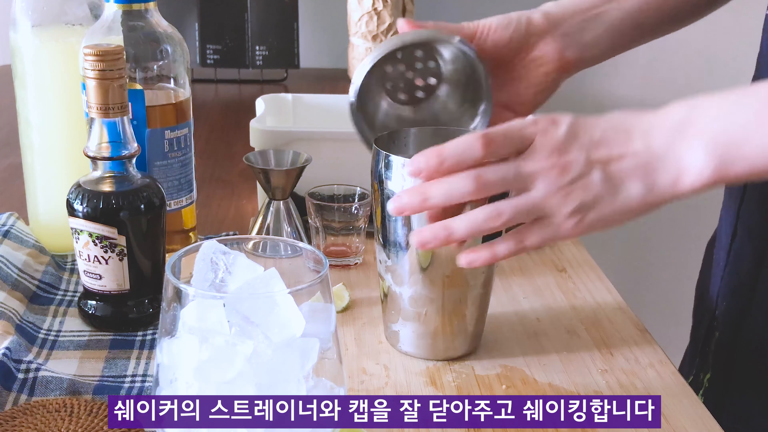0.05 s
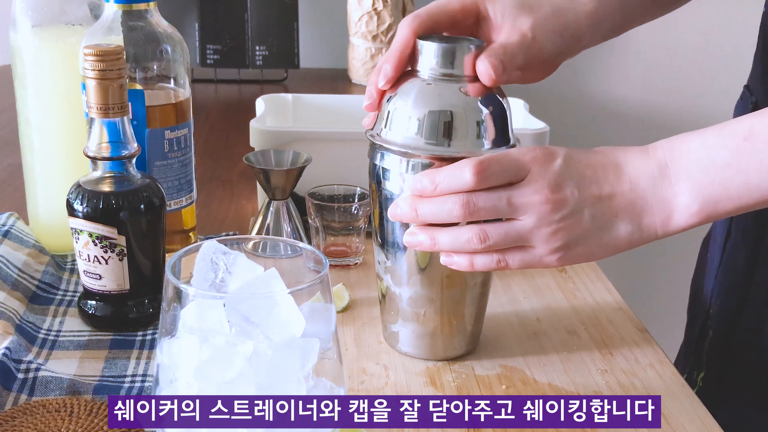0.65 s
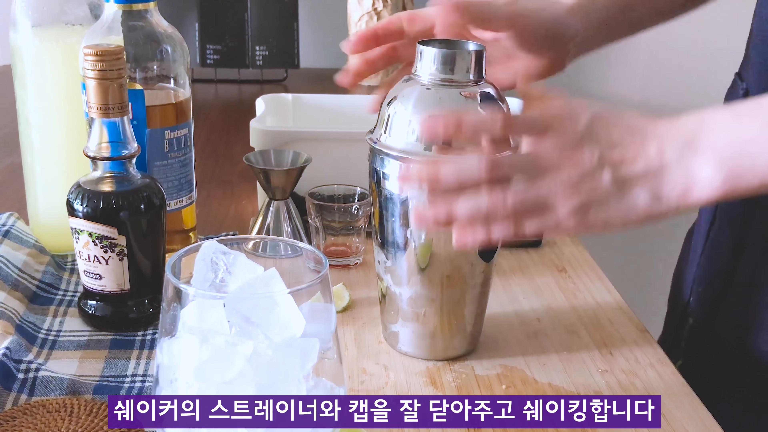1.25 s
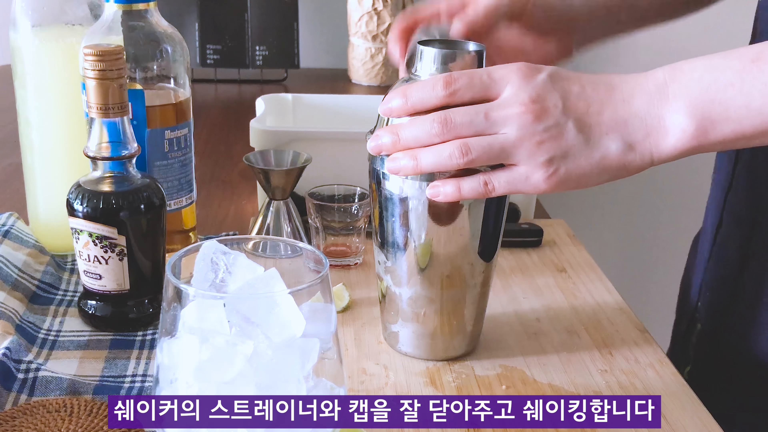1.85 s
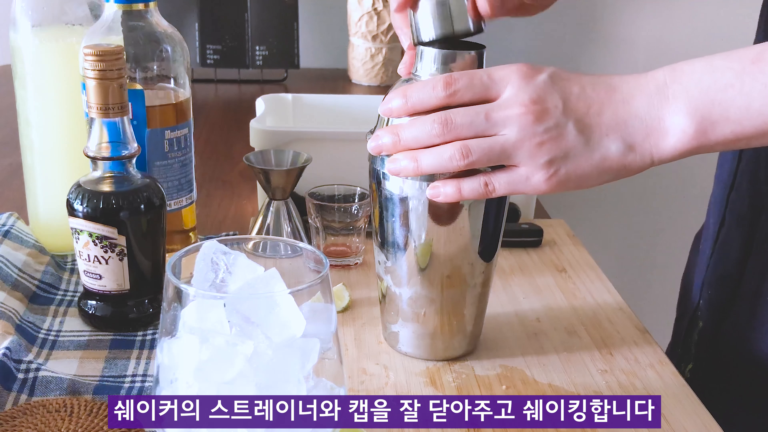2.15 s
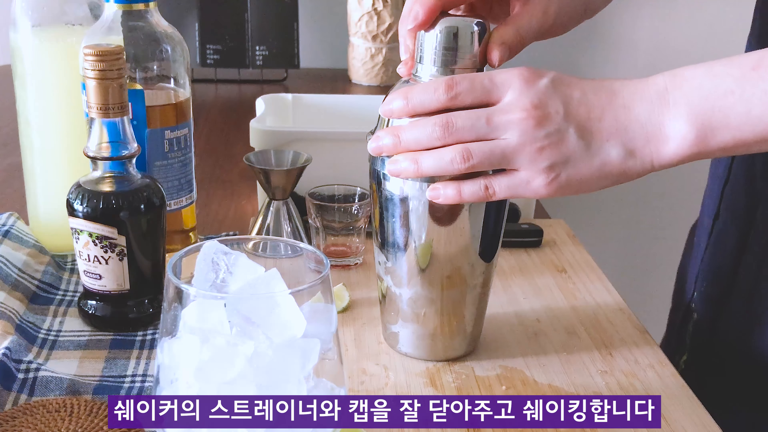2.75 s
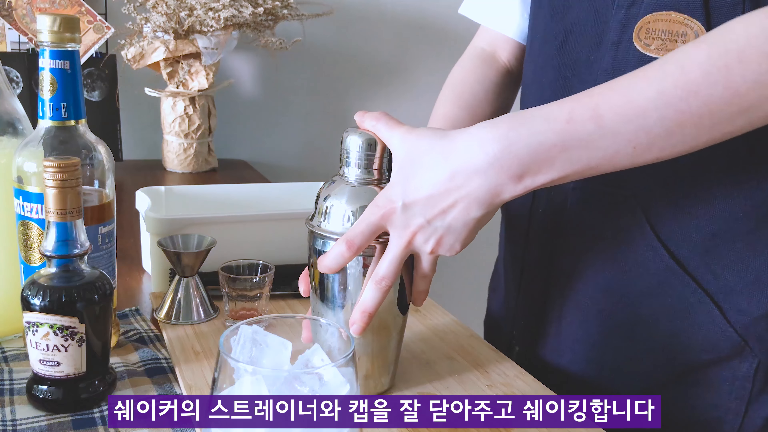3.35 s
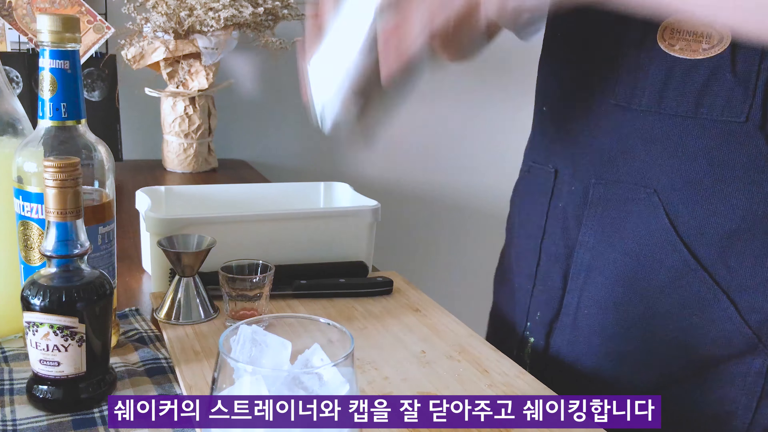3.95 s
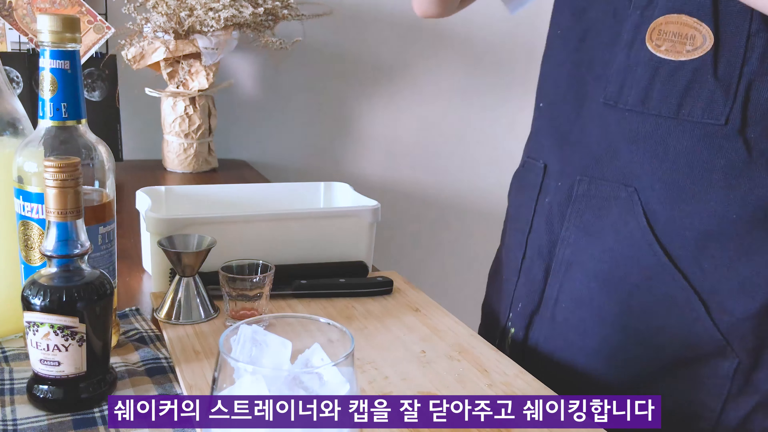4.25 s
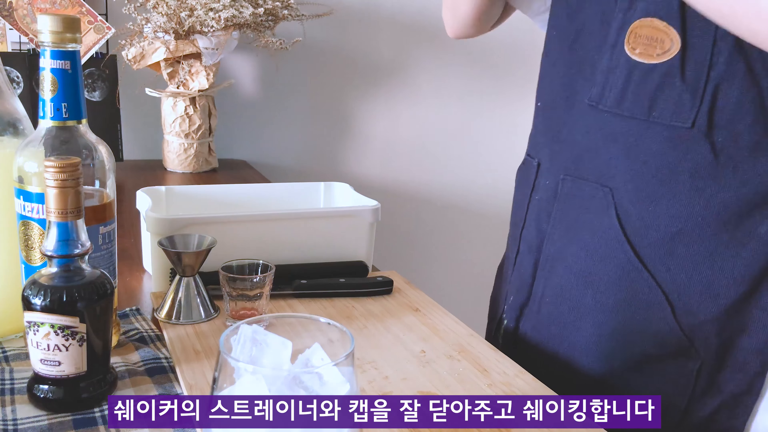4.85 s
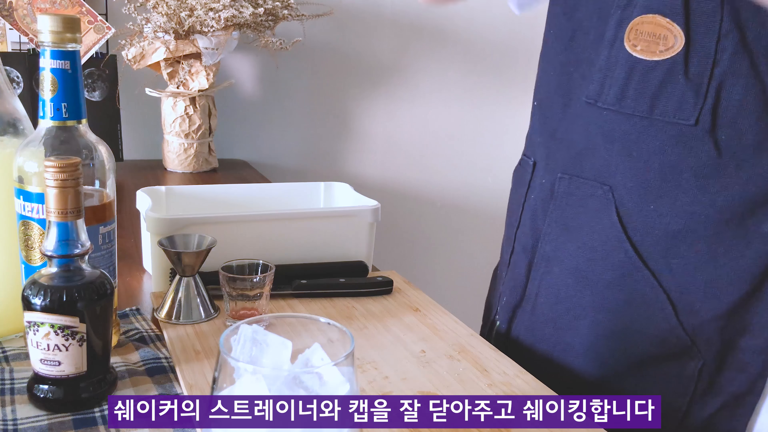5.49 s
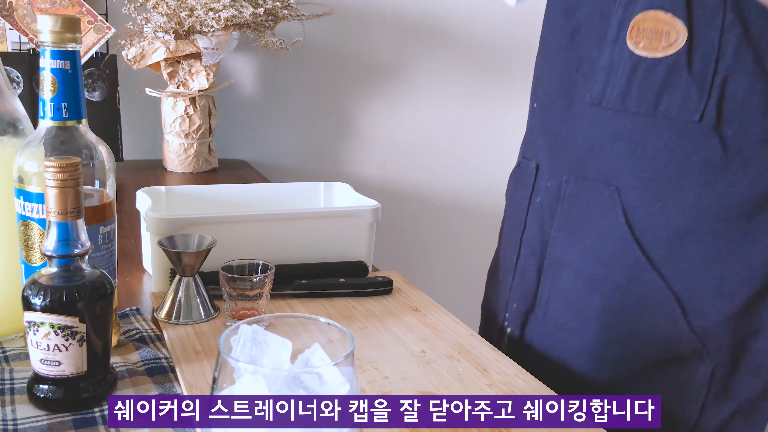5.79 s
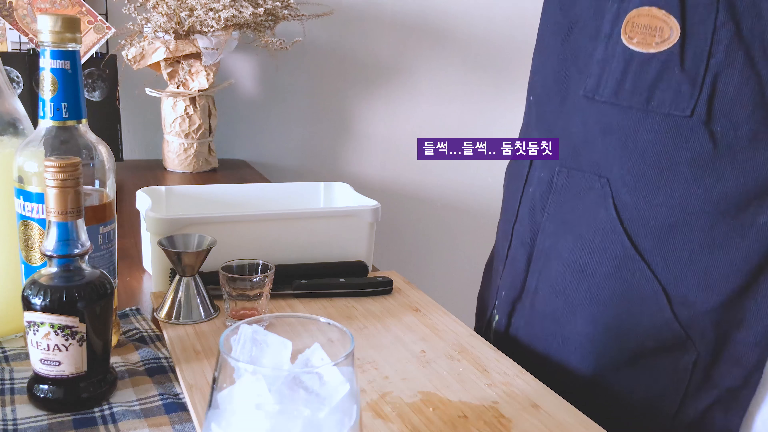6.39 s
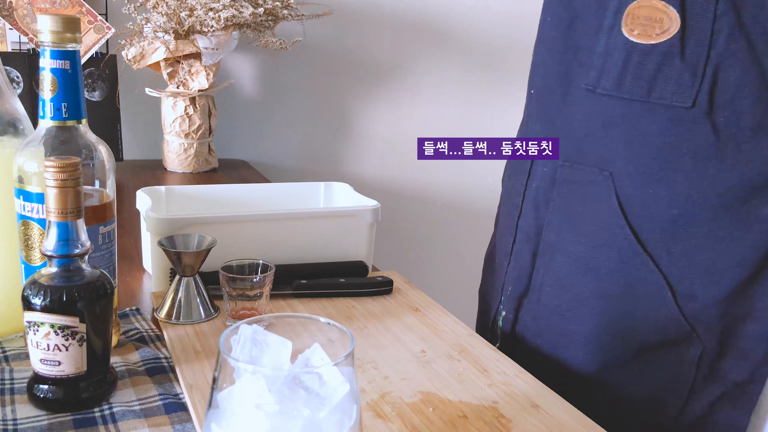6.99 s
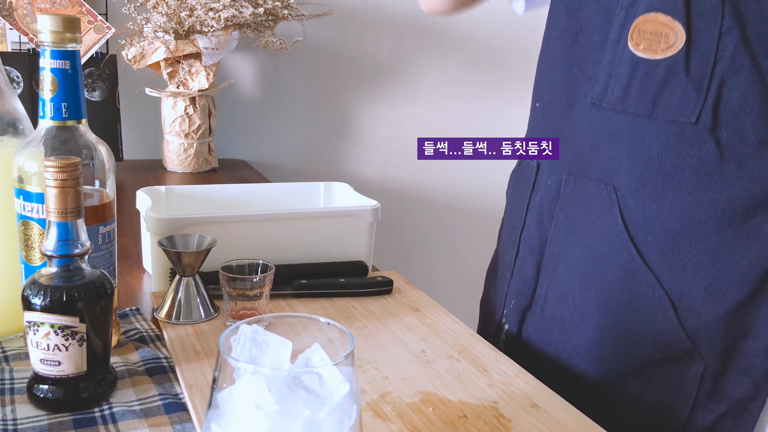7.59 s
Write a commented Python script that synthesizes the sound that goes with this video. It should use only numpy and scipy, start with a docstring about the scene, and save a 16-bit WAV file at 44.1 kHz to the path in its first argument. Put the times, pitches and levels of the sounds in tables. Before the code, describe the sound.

A metal lid and cap clank onto a cocktail shaker, then ice rattles fast and hard inside as it is shaken.

```python
"""A small room, the microphone close to a steel cocktail shaker on a wooden board. The strainer lid
clanks on and slides home, the tin knocks on the wood, the small cap clicks and scrapes into place.
The room's hum and hiss drop abruptly. The shaker is lifted and shaken hard: at each turn of the stroke
ice cubes slam into an end of the tin and set it ringing, while drink and chips churn between them."""
import sys
import numpy as np
from scipy import signal
from scipy.fft import rfft, irfft, next_fast_len
from scipy.io import wavfile
from scipy.ndimage import uniform_filter1d

SR = 44100
rng = np.random.default_rng(int(sys.argv[2]) if len(sys.argv) > 2 else 0)


def to_wav(s):
    """Save 16-bit WAV."""
    ch = np.atleast_2d(s).T  # columns
    pcm = np.round(np.clip(ch, -1, 1) * 32767)  # PCM
    wavfile.write(sys.argv[1], SR, pcm.astype(np.int16))


N = 336483
TIME = np.arange(N) / SR

# Spectra of the background and of the contacts. Each row: frequency in Hz, relative level in dB.
AIR_EARLY_COLOUR = [(12, -28), (20, -13), (48, 0.5), (75, -3), (148, -0.5), (261, -3), (336, -3),
                    (983, -11), (1200, -10), (1300, -12.5), (1730, -15.5), (2790, -23.5), (9670, -32.5),
                    (15600, -38.5), (17000, -46)]
AIR_LATE_COLOUR = [(12, -56), (20, -24.5), (31, -21), (43, -10), (100, -6), (176, -12), (214, -10.5),
                   (276, -13.5), (543, -14.5), (830, -19), (1780, -25.5), (3130, -34.5), (9140, -43),
                   (14400, -48), (17000, -61)]
RUMBLE_COLOUR = [(20, -15), (50, -2.5), (80, -3.5), (150, -3), (300, -1), (600, -11.5), (2000, -58.5)]
STEEL_COLOUR = [(88, -31.5), (150, -21), (760, -12.5), (1680, -3), (1970, -13), (2400, -6.5), (3560, -8),
                (4090, -8.5), (5950, -9), (7550, -12.5), (8340, -11.5), (13400, -16), (17000, -23.5)]
BOARD_COLOUR = [(100, -6.5), (500, 1), (1000, -1.5), (1900, 2), (4000, -10), (8000, -15), (16000, -40)]
ICE_COLOUR = [(53, -56), (90, -19), (252, -10), (321, -1.5), (436, -6), (606, -4.5), (723, -0.5),
              (2120, -2), (2360, -3), (3010, -7.5), (5560, -11.5), (8240, -14.5), (9000, -14.5),
              (15900, -23.5), (17000, -22)]
CHIP_COLOUR = [(100, -36), (300, -27), (800, 0.5), (2000, 4), (4000, -3), (7000, -6.5), (10000, -13),
               (16000, -18)]
# Handling rumble and steel sliding on steel. Each row: time in seconds, relative level in dB.
RUMBLE_LEVEL = [(0, -52), (.9, -52), (.95, -39.5), (1.02, -56), (2.95, -71), (2.99, -40.5), (3.045, -42),
                (3.06, -71), (4.1, -66.5), (4.3, -53), (5.5, -58), (6.5, -54), (7.63, -60)]
LID_SLIDE = [(.35, -70), (.37, -45), (.43, -42), (.5, -42), (.53, -38.5), (.57, -38.5), (.61, -50),
             (.68, -81), (.76, -48), (.8, -75)]
CAP_SLIDE = [(1.95, -73), (1.97, -40), (2.03, -34), (2.08, -41.5), (2.13, -66), (2.2, -46), (2.27, -58),
             (2.4, -71)]
LIFT_SLIDE = [(3.4, -82), (3.5, -64), (3.62, -66), (3.7, -73.5), (3.78, -74.5), (3.95, -87), (4.12, -73),
              (4.17, -51)]
# Single blows. Each row: start in seconds, clack level in relative dB, then thud, tick and ring in dB
# over the clack; for cap and cubes also a nominal pitch in Hz.
LID_BLOWS = [(.159, -39.5, -13.5, -1, -20), (.2548, -49, 10, -16, -18), (.3443, -18, -21, 0.5, -3.5),
             (.3495, -23, -1, -3, 0), (.4094, -29, -5, -0.5, -18), (.52, -35.5, 0.5, -6, -3),
             (.735, -64, 14, -6, 1), (.7771, -39, 0, -9.5, -22), (1.197, -56.5, 10, 5, -14),
             (1.2316, -50, 6, 7, -5)]
BOARD_BLOWS = [(1.6836, -36.5, -10, -10, -10), (1.687, -42, 16.5, -14, 16.5), (1.693, -44, 14, -1, 10),
               (1.714, -38.5, 3, -9, -10), (3.8549, -52, 2, -6, -2), (3.9312, -47.5, 0, -14, -10)]
CAP_BLOWS = [(1.9537, -26.5, -12, 7.5, -8, 2080), (1.961, -31, -12, 0, 1, 3900),
             (2.0149, -38.5, -1, 3, -6, 1690), (2.045, -39, -9, -7, 0, 3820),
             (2.0994, -30.5, -17, 12.5, 10, 2475), (2.109, -35, -2, 10, 11, 2370),
             (2.145, -42.5, -19, 0, 12.5, 2560), (2.2, -52, -15, -10, 16, 2310),
             (2.232, -55, -24, -7, 17, 2510), (2.3147, -50, -15, 5, 2, 2860), (2.4641, -55, 0, 2, 4, 3800)]
CUBE_BLOWS = [(4.1665, -52, 9, -7, -1, 657), (4.1793, -30, -32.5, 4.5, 6, 1790),
              (4.204, -33, -14, -11, 6, 2790), (4.234, -31.5, -15, 9, 9, 2030),
              (4.243, -23, -3, 4, 4.5, 2350), (4.25, -24.5, -6, 2, -3, 2310),
              (4.338, -23.5, -2.5, 1, 7.5, 4080), (4.357, -26.5, 1, 4, 6, 1160),
              (4.4739, -23, -6, -19, -9, 884), (4.4891, -23.5, -21, -2.5, 5, 1540),
              (4.512, -19.5, -4, -4, 4, 990), (4.5197, -26.5, -6, -12, 12.5, 2700),
              (4.564, -27.5, -12, 2.5, 0, 4000), (4.624, -27, 4, -1, 4, 1820),
              (4.636, -24.5, -10, 5.5, 11.5, 2240), (4.6413, -22, -5.5, 5, 6, 2470),
              (4.6707, -20, -24, -14, -5, 1760), (4.7493, -28, -19, 5, 8, 1410),
              (4.7654, -23, -7, -11, 4, 980), (4.775, -19, -13, 4.5, 8, 1280),
              (4.8397, -17.5, -13, -13, 3, 1940), (4.894, -27.5, -11, -7, 0, 1460),
              (4.9476, -19.5, -5, -5, 0, 2780), (4.9643, -24.5, -7, -10, 6, 1120),
              (5.0643, -20, -22, 7, 9.5, 2402), (5.08, -30, -11, 9, -6, 2550),
              (5.2037, -20, -16, -3, -2, 1800), (5.229, -22, -18, -7, 2, 1800),
              (5.2762, -31, 1, 2, -6, 2920), (5.2963, -27.5, 8, 11.5, 19, 5120),
              (5.3318, -36, 7, -12, 14, 1130), (5.4142, -24.5, -5, -19, 7, 1485),
              (5.4367, -22.5, -10, -21, 0, 2300), (5.4957, -23, 6, -0.5, 5.5, 1375),
              (5.505, -26.5, -4, 4.5, 8, 1450), (5.631, -36, -20, -10, 2, 1640),
              (5.6553, -22, 2.5, -2, -7, 760), (5.6858, -27.5, -19, 5.5, 9, 3050),
              (5.7677, -20, -8, -6.5, 2.5, 730), (5.8781, -25, -12, -8, 6, 2000),
              (5.8852, -16, -7.5, -14.5, -2.5, 1440), (5.8892, -15.5, -6.5, -5, -5, 1480),
              (5.9401, -28.5, -10, -11, -5, 2080), (5.983, -28.5, 4.5, 6.5, 8, 1370),
              (6.0118, -23.5, -8, 1, 4.5, 2286), (6.1269, -27.5, -13, -1.5, 6, 1720),
              (6.153, -19, -15, 4, 3.5, 3050), (6.2336, -24.5, -9, 5, 9, 1860),
              (6.3157, -27.5, -9, -14, 3, 1480), (6.35, -18, -3, -4, -1.5, 2380),
              (6.4252, -28, 5.5, 5, 11, 4140), (6.4597, -25, -15, -1, 5, 2090),
              (6.4637, -24, -3, 6.5, -7, 1990), (6.5594, -43, -9, 8, -4, 4920),
              (6.573, -24, -14, 0.5, -1, 1420), (6.5865, -23, -22, 0, 7, 1690),
              (6.6094, -26, -15, 3, -2, 5270), (6.6456, -29, -17, 5, 5.5, 1140),
              (6.6735, -22.5, -6, -.5, -1, 1150), (6.767, -22, -23, -9, -15, 1480),
              (6.788, -18, -22, -13, -22, 1370), (6.8119, -19.5, -8.5, -19, -6, 1880),
              (6.8345, -25.5, -20, 1.5, 8, 4000), (6.9036, -28, 3.5, -4, 8.5, 2560),
              (7.0012, -33.5, -12, 6, 12, 1030), (7.0243, -26.5, -22, -2.5, 0, 2020),
              (7.045, -25, -3, -10, -4, 3680), (7.085, -33, 2, -15, 6, 2340),
              (7.1278, -25, -1.5, -3, 3.5, 816), (7.147, -22, -10, -14, -1, 1830),
              (7.2233, -31, -20, -2, 10, 5700), (7.2417, -23.5, -4, -3.5, -5, 950),
              (7.3035, -26.5, 1, 0, 8, 2840), (7.37, -19, -30, 1, 4.5, 2330),
              (7.4395, -28.5, -1, -3, 7, 1070), (7.4675, -24, -22, -12, -8, 2120),
              (7.4863, -35, -10, 11.5, -3, 4000), (7.5247, -26.5, -12, -17, -4, 1690),
              (7.5576, -22.5, 2, 2.5, 0.5, 714)]
# The bands of thud, clack and tick. Each row: lower and upper edge in Hz.
BLOW_BANDS = [(100, 800), (800, 3200), (3200, 18000)]
# Ringing modes. Each row: frequency in Hz, relative level in dB, seconds to fade by 60 dB.
LID_MODES = [(329.7, -13.5, 0.26), (555, -13, 0.04), (850, -12.5, .12), (1373, -15, .25), (1498, -14, 0.43),
             (1745, -17, 0.61), (1740, -23, .3), (2464, -15.5, 0.35), (3025, -21.5, 0.25),
             (4030, -14.5, .25), (4150, -17, .33), (4390, -21.5, .42), (5220, -18.5, 0.45),
             (5680, -28, .45), (6140, -24.5, 0.19), (6180, -27, .3), (6650, -1, 0.13), (6640, -27, 0.37),
             (8920, -6.5, 0.14), (9420, -16, 0.13), (9700, -23.5, 0.31), (12200, -28.5, .45),
             (12230, -31.5, .5), (13440, -27.5, .55), (15510, -26.5, .4)]
BOARD_MODES = [(339, -14, .12), (475, 4.5, 0.1), (702, -8, 0.18), (1710, -14.5, .05)]
CAP_MODES = [(1670, -30.5, 0.22), (2097, -13, 0.073), (2370, -10.5, 0.15), (2530, -24.5, 0.15),
             (2850, -34, 0.38), (3750, -32, 0.374), (3970, -26, 0.17), (5000, -17, 0.22), (5600, -21, .15),
             (7000, -10.5, 0.24), (7580, -1, 0.29), (7400, -12, .3), (8800, -25.5, 0.18),
             (10500, -17.5, 0.19), (13700, -22.5, .4), (15450, -25.5, .4)]
FULL_TIN_MODES = [(158.6, -25, 0.15), (330, -16.5, 0.11), (343, -21.5, 0.074), (471, -16.5, 0.12),
                  (546.4, -17, 0.29), (707, -18, 0.2), (770, -41, 0.071), (1135, -14.5, 0.21),
                  (1555, -46, 0.073), (2450, -29, 0.16), (4460, -15, 0.064), (5520, -40, 0.12),
                  (6880, -13, 0.038), (8900, -8, 0.048), (11500, -26, 0.07)]
# Turns of the stroke, about nine a second, when the load lands in an end of the tin.
# Each row: start in seconds, length of the landing in seconds, relative level in dB.
TURNS = [(4.179, .035, -41), (4.24, .045, -32.5), (4.34, 0.043, -31.5), (4.48, .065, -26.5),
         (4.626, .075, -32.5), (4.715, 0.073, -28.5), (4.845, .07, -31), (4.945, 0.055, -30.5),
         (5.045, 0.056, -28.5), (5.205, 0.072, -28), (5.296, 0.036, -30), (5.393, 0.039, -25.5),
         (5.485, 0.058, -27.5), (5.654, 0.043, -29), (5.76, .03, -34), (5.875, 0.046, -29.5),
         (5.98, 0.059, -30), (6.107, 0.041, -24.5), (6.22, 0.036, -26.5), (6.313, 0.052, -26.5),
         (6.43, 0.051, -27), (6.572, .04, -35.5), (6.645, 0.058, -31.5), (6.77, 0.061, -28),
         (6.873, 0.055, -30), (7, 0.064, -31.5), (7.114, 0.038, -33.5), (7.221, 0.045, -30.5),
         (7.3, .035, -33.5), (7.429, 0.064, -29.5), (7.49, 0.049, -33.5), (7.556, 0.026, -33.5)]
# The room's reverberation. Each row: frequency in Hz, seconds to fade by 60 dB.
ROOM_DECAY = [(150, 0.35), (500, 0.57), (1500, 0.4), (4000, 0.46), (8000, 0.4), (16000, 0.3)]


def amp(db):
    """Decibels to gain."""
    return 10 ** (np.asarray(db) / 20)


def unit(x):
    """Scales to rms 1."""
    return x / np.sqrt(np.mean(x ** 2) + 1e-20)


def at_hz(points, hz):
    """Reads a table on a log-frequency axis."""
    f, value = np.transpose(points)
    return np.interp(np.log(hz + 1), np.log(f + 1), value)


def level(curve):
    """Gain over time from rows of seconds and dB, silent outside them."""
    s, db = np.transpose(curve)
    return amp(np.interp(TIME, s, db, left=-150, right=-150))


def add(mix, start, sound):
    """Mixes a sound in at a start in seconds."""
    part = mix[max(round(start * SR), 0):][:len(sound)]
    part += sound[:len(part)]


def tinted(x, colour):
    """Gives a signal a spectrum."""
    count = x.shape[-1]
    size = next_fast_len(count)
    gains = amp(at_hz(colour, np.fft.rfftfreq(size, 1 / SR)))
    return irfft(rfft(x, size) * gains, size)[..., :count]


def noise(colour):
    """Steady coloured noise of rms 1."""
    return unit(tinted(rng.standard_normal(N), colour))


def grains(per_s, spread_db):
    """Sparse clicks of uneven size."""
    sizes = amp(spread_db * np.minimum(rng.exponential(1, N), 3.5))
    return sizes * rng.choice([-1., 1.], N) * (rng.random(N) < per_s / SR)


def room_tone(drop_s=3.055):
    """Hum and hiss, abruptly quieter part way through, with the low rumble of handling."""
    early = amp(-45.5) * noise(AIR_EARLY_COLOUR)
    late = amp(-56.5) * noise(AIR_LATE_COLOUR)
    rumble = level(RUMBLE_LEVEL) * noise(RUMBLE_COLOUR)
    return np.where(TIME < drop_s, early, late) + rumble


def shell_colour(modes, width_hz, valley_db):
    """A rough contact drives the steel shell in broad humps around its modes."""
    grid = np.geomspace(60, 20000, 600)
    hz, db, _ = np.transpose(modes)[:, :, None]
    humps = np.sum(amp(db - db.max()) / (1 + (2 * (grid - hz) / width_hz) ** 2) ** 2, 0)
    return np.c_[grid, at_hz(STEEL_COLOUR, grid) + 10 * np.log10(humps + amp(valley_db) ** 2)]


def impacts(blows, colour, thud_s, clack_s, tick_s):
    """Each blow is a burst in three bands; the bass swells later and dies more slowly than the treble."""
    t = np.arange(2048) / SR
    burst_energy = .005 * SR  # as much as 5 ms at rms 1
    starts, clack_db, thud_db, tick_db = np.transpose(blows)[:4]
    band_levels = (clack_db + thud_db, clack_db, clack_db + tick_db)
    softness = np.exp(rng.uniform(-.6, .6, (len(starts), 1)))  # clean cracks to crushing contacts
    out = np.zeros(N)
    for edges, db, fade_s in zip(BLOW_BANDS, band_levels, (thud_s, clack_s, tick_s)):
        band = signal.butter(3, edges, "bandpass", fs=SR, output="sos")
        grit = tinted(rng.standard_normal((len(starts), 2 * len(t))), colour)
        grit = signal.sosfilt(band, grit)[:, len(t):]
        age = t / (fade_s * softness)
        bursts = grit * np.exp(-age) * (1 - np.exp(-age / 0.37))
        bursts *= np.sqrt(burst_energy / np.sum(bursts ** 2, 1, keepdims=True))
        for start, gain, burst in zip(starts, amp(db), bursts):
            add(out, start, gain * burst)
    return out


def ringing(blows, modes, uneven_db, detune):
    """Each blow lands somewhere else and shares itself differently among modes the load shifts a little."""
    t = np.arange(SR // 2, dtype=np.float32) / SR
    hz, db, t60 = np.transpose(modes)[:, :, None].astype(np.float32)
    t = t[t < t60.max()]
    fades = amp(db) * np.exp(-np.log(1000) * t / t60)
    out = np.zeros(N)
    for start, clack_db, _, _, ring_db, *_ in blows:
        shift, strength, polarity = rng.standard_normal((3, len(modes), 1))
        phases = (2 * np.pi * hz * (1 + detune * shift)).astype(np.float32) * t
        shares = amp(uneven_db * strength) * np.sign(polarity)
        add(out, start, amp(clack_db + ring_db) * np.sum(shares * fades * np.sin(phases), 0))
    return out


def rubbing(colour, modes, per_s, spread_db, ring_share, damping):
    """Tiny slips of steel on steel, in uneven clumps, ring the hand-damped modes."""
    t = np.arange(SR // 5) / SR
    clumps = amp(1.8 * unit(uniform_filter1d(rng.standard_normal(N), size=350)))
    slips = grains(per_s, spread_db) * clumps
    shell = sum(amp(db) * np.exp(-np.log(1000) * damping * t / t60) * np.sin(2 * np.pi * hz * t)
                for hz, db, t60 in modes)
    ring = unit(signal.oaconvolve(slips, shell)[:N])
    return unit(unit(tinted(slips, colour)) + ring_share * ring)


def lid():
    """The strainer lid clanks onto the tin, slides home, and whispers as the shaker is lifted."""
    colour = shell_colour(LID_MODES, width_hz=300, valley_db=-15)
    blows = impacts(LID_BLOWS, colour, thud_s=0.0068, clack_s=0.0044, tick_s=0.0049)
    ring = ringing(LID_BLOWS, LID_MODES, uneven_db=1, detune=.001)
    held = shell_colour(LID_MODES, width_hz=450, valley_db=-9)  # pressed home, the lid is damped
    friction = rubbing(held, LID_MODES, per_s=5200, spread_db=5, ring_share=0.19, damping=5.2)
    slide = friction * (level(LID_SLIDE) + level(LIFT_SLIDE))
    return blows + amp(-2) * ring + amp(-1) * slide


def board():
    """Dull knocks of the tin on the wooden board, with little deep bass."""
    blows = impacts(BOARD_BLOWS, BOARD_COLOUR, thud_s=0.008, clack_s=0.005, tick_s=.004)
    ring = ringing(BOARD_BLOWS, BOARD_MODES, uneven_db=1, detune=.01)
    bass_cut = signal.butter(2, 220, "highpass", fs=SR, output="sos")
    return signal.sosfilt(bass_cut, blows + amp(-4) * ring)


def clinks(blows, t60, width, wall_t60, wall_hz=2410):
    """Each collision rings briefly at its own pitch; near the wall's main mode, purer and longer."""
    t = np.arange(SR // 8) / SR
    out = np.zeros(N)
    for start, clack_db, _, _, ring_db, hz in blows:
        offsets = rng.uniform(-0.71, 1, (4, 1))
        wall_match = np.exp(-((hz - wall_hz) / 70) ** 2)
        fade = np.exp(-np.log(1000) * t / (t60 + wall_match * wall_t60))
        partials = np.sin(2 * np.pi * hz * (1 + width * (1 - 0.85 * wall_match) * offsets) * t)
        clink = fade * (partials[0] + .5 * partials[1:].T @ np.sign(offsets[:-1, 0]))
        clink *= np.linalg.norm(fade) / np.linalg.norm(clink)
        size = min(1, wall_hz / hz)  # high pitches come from small pieces, which ring weakly
        add(out, start, size * amp(clack_db + ring_db) * clink)
    return out


def cap():
    """The small cap clicks onto the neck and scrapes down over it; its clink shifts as it seats."""
    colour = shell_colour(CAP_MODES, width_hz=310, valley_db=-16)
    blows = impacts(CAP_BLOWS, colour, thud_s=0.0032, clack_s=0.0031, tick_s=0.00079)
    ring = ringing(CAP_BLOWS, CAP_MODES, uneven_db=1.5, detune=.001)
    seating = clinks(CAP_BLOWS, t60=0.031, width=0.032, wall_t60=0.048)
    friction = rubbing(colour, CAP_MODES, per_s=3500, spread_db=3.5, ring_share=.3, damping=5.7)
    return blows + amp(-3) * ring + amp(-1.5) * seating + amp(1) * friction * level(CAP_SLIDE)


def small_pieces(start, length, db, count, low_hz=854, high_hz=3670):
    """Rows of blows for bits of ice landing in turn, each with its own strength, colour and pitch."""
    delay, size = rng.random((2, count))
    mean_db, spread_db = (-3, -7.5, -0.5, 1), (2, 5.8, 5.7, 3.7)  # clack, thud, tick, ring
    scatter = rng.uniform(-1, 1, (count, 4)) * np.sqrt(3)
    piece_db = mean_db + scatter * spread_db
    starts = start + length * (np.arange(count) + delay) / count
    hz = high_hz * (low_hz / high_hz) ** size
    return np.c_[starts, db + piece_db[:, 0], piece_db[:, 1:], hz]


def chatter(blows, rise_s=0.0027, settle_s=0.0059):
    """Each blow sets the neighbouring cubes chattering for a moment."""
    t = np.arange(SR // 10) / SR
    stir = np.exp(-t / settle_s) * (1 - np.exp(-t / rise_s))
    agitation = np.sqrt(abs(signal.oaconvolve(blows ** 2, stir / stir.sum())[:N]))
    return agitation * unit(tinted(grains(per_s=2600, spread_db=3), CHIP_COLOUR))


def churn(rise_s=0.007, settle_s=0.075):
    """Drink and chips are stirred up quickly by each landing, then slowly settle."""
    t = np.arange(SR // 2) / SR
    swell = (1 - np.exp(-t / rise_s)) * np.exp(-t / settle_s)
    power = np.zeros(N)
    for start, _, db in TURNS:
        add(power, start, (amp(db) * swell / swell.max()) ** 2)
    return np.sqrt(power) * unit(tinted(grains(per_s=2200, spread_db=4.5), ICE_COLOUR))


def ice():
    """Cubes and small pieces hit the ends of the full tin at each turn; stray chips tick in between."""
    landings = np.vstack([CUBE_BLOWS] + [small_pieces(*turn, count=3) for turn in TURNS])
    loose_s = TURNS[2][0]  # the ice has come loose by the third turn
    strays = small_pieces(loose_s, TIME[-1] - loose_s, db=-33, count=35)
    hits = np.vstack([landings, strays])
    blows = impacts(hits, ICE_COLOUR, thud_s=0.0044, clack_s=0.0019, tick_s=0.0017)
    cubes = clinks(hits, t60=.03, width=.13, wall_t60=.07)
    tin = ringing(landings, FULL_TIN_MODES, uneven_db=3, detune=.012)
    rattle = amp(-1.5) * (blows + cubes) + amp(-9) * tin + amp(-6.5) * chatter(blows) + amp(-9) * churn()
    bass_cut = signal.butter(4, 125, "highpass", fs=SR, output="sos")  # the shaking carries little deep bass
    return signal.sosfilt(bass_cut, rattle)


def room(sound, reflections_per_s=4000, onset_s=0.0012):
    """The small room returns a dense tail of reflections, each band dying at its own speed."""
    shape = (3, SR * 2 // 3)  # one tail for each of three positions
    taps = rng.choice([-1., 1.], shape) * (rng.random(shape) < reflections_per_s / SR)
    hz, t, spectra = signal.stft(taps, SR, nperseg=256)
    fades = np.exp(-np.log(1000) * t / at_hz(ROOM_DECAY, hz)[:, None])
    tails = signal.istft(spectra * fades, SR)[1]
    tails *= 1 - np.exp(-(np.arange(tails.shape[1]) / SR / onset_s) ** 2)
    tails /= np.linalg.norm(tails, axis=1, keepdims=True)
    # the shaker moves about, so the pattern of reflections keeps changing
    blend = np.sqrt(2 / 3) * np.cos(2 * np.pi * (1.3 * TIME + np.arange(3)[:, None] / 3))
    return signal.oaconvolve(sound * blend, tails, axes=1).sum(0)[:N]


def scene():
    """Closing and shaking, close to one microphone, with the room behind."""
    closing = lid() + cap() + board()
    shaking = ice()
    reflections = room(amp(-9) * closing + amp(-7.5) * shaking)
    return (closing + shaking + reflections + room_tone())[None]


def record(dry):
    """The microphone signal is limited at full scale and cut off above 16.6 kHz."""
    low_pass = signal.firwin(511, 16600, window=("kaiser", 9), fs=SR)
    return signal.oaconvolve(np.clip(dry, -1, 1), low_pass[None], "same")


dry = scene()
out = record(dry)
to_wav(out)
```